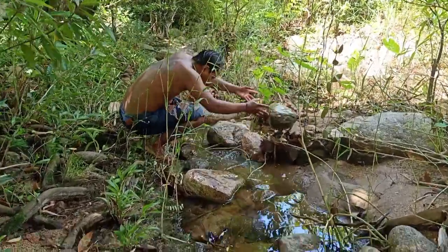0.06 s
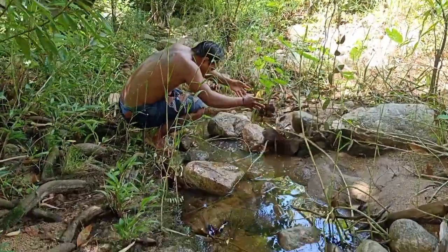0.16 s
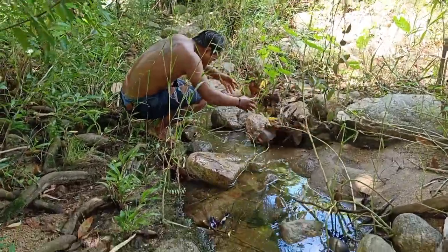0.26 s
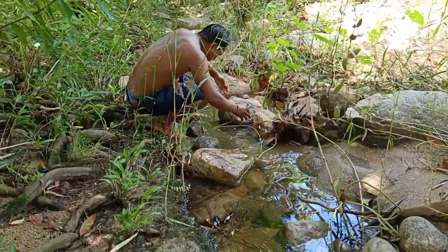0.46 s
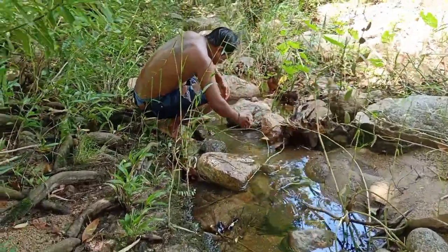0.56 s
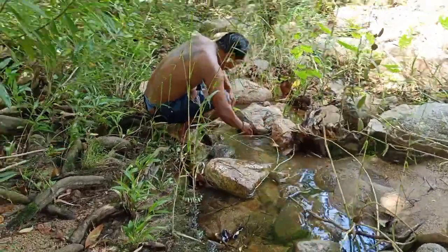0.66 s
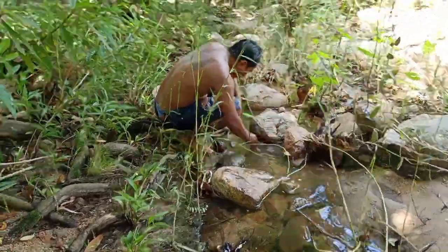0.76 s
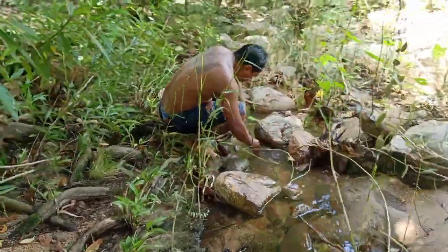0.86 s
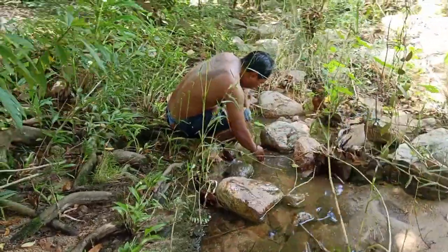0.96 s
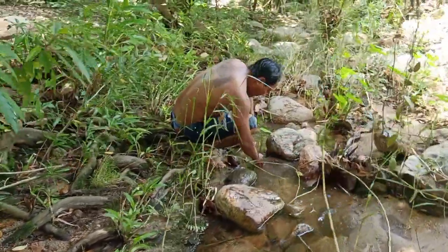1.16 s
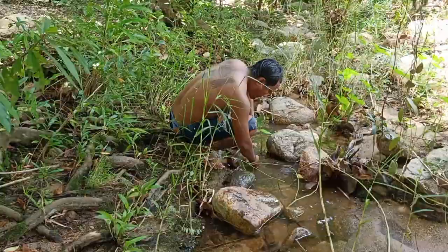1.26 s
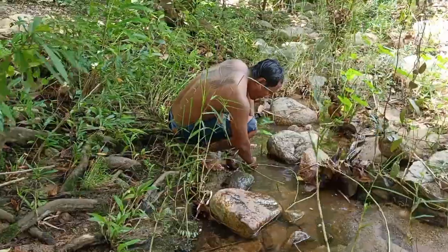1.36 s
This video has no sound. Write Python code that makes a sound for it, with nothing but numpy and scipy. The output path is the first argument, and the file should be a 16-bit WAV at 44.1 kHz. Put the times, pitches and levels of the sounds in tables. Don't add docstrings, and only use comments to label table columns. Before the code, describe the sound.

One close, round water plop with gliding bubble tones and quick rock echoes, preceded by a brief slide through leaves and faint clicks, over a soft constant brook hiss outdoors, in stereo.

```python
import sys
import numpy as np
from scipy import signal
from scipy.fft import rfft, irfft
from scipy.io import wavfile
from scipy.ndimage import uniform_filter1d

SR = 44100
rng = np.random.default_rng(int(sys.argv[2]) if len(sys.argv) > 2 else 0)


def voltage_ratio(level):
    return 10 ** (np.asarray(level, float) / 20)


def wav_record(signal):
    frames = np.transpose(np.atleast_2d(signal))
    bounded = np.clip(frames, -1, 1)
    quanta = np.round(bounded * 32767).astype(np.int16)
    wavfile.write(sys.argv[1], SR, quanta)


N = 61739

# (frequency [Hz], level per Hz [dB])
STREAM_SPECTRUM = [(40, -30.5), (110, -6.5), (300, 0), (800, 0.5), (1400, -5.5), (2500, -4), (3500, -13.5),
                   (14000, -33.5)]
# (frequency [Hz], share [0-1])
COMMON_SHARE = [(40, 1), (120, 0.94), (300, 0.98), (700, 0.59), (1400, .36), (2500, 0.15), (3500, 0.01)]
# (centre [Hz], width [Hz], boost [dB])
LEFT_MIC = [(1970, 420, 1), (2250, 1600, 3), (5740, 2900, 10), (11140, 860, 4), (14730, 1700, -17)]
# (centre [Hz], width [Hz], boost [dB])
RIGHT_MIC = [(1980, 700, 2), (4220, 1000, 0), (8400, 2770, 9.5), (11400, 510, 2.5), (15200, 730, -8)]
# (time [s], level [dB])
SLIDE_PRESSURE = [
    (.105, -25),
    (.135, -2),
    (.17, 0),
    (.2, -1),
    (.225, -8),
    (.29, -22),
]
# (frequency [Hz], level per Hz [dB])
LEAF_SPECTRUM = [(1200, -9), (2700, 3.5), (3600, 0), (5000, -13), (6300, -12), (8000, -19.5), (12000, -18),
                 (14500, -48)]
# (time [s], level [dB], pitch [Hz])
PEBBLE_TICKS = [
    (.1410, -37, 2700),
    (.1928, -29, 2500),
    (.1955, -34, 2550),
    (.1985, -35, 3000),
    (.2018, -28.5, 2600),
]
# (delay [s], left level [dB], right level [dB])
ROCK_ECHOES = [
    (0, 0, -1.1),
    (.0024, -22, -15),
    (.00375, -10.5, -7.5),
    (.0092, -23.5, -19),
    (.0129, -40, -13.2),
    (.0199, -40, -21),
    (.0262, -40, -31),
]
# (start time [s], left level [dB], right level [dB], start pitch [Hz], rise [Hz/s])
TRAPPED_AIR = [
    (.2124, -20.5, -45, 432, 10800),
    (.2123, -24, -24, 930, -3000),
    (.2106, -20.5, -33, 418, 1800),
    (.2241, -22.5, -30, 642, 9250),
    (.2098, -23, -22, 1250, 100),
]

STREAM_DB, SWELL_DB, FLICKER_DB = -43, 0.62, 0.98
RIGHT_LAG_S = 0.00033
BUBBLES_PER_S = 60
BUBBLE_CYCLES, BUBBLE_GLIDE = 7.5, 0.26
BUBBLE_DB, BUBBLE_SPREAD_DB = -6.5, 2
SLIDE_DB, SLIDE_RIGHT_DB = -43.5, -2
GRAINS_PER_S, GRAIN_SPREAD_DB = 6200, 1.2
TICK_T60_S, TICK_RIGHT_DB = 0.013, -5
PLOP_S, PLOP_DB, PUSH_S = 0.2081, -3.7, 0.00165
PLOP_HZ, PLOP_WIDTH_HZ = 925, 735
AIR_CYCLES = 31
TAIL_DB, TAIL_T60_S, TAIL_HZ, TAIL_WIDTH_HZ = -41, 0.4, 680, 780
LOW_CUT_HZ, DULL_HZ = 155, 1450
MIC_TOP_HZ = 15500


def curve(table, hz):
    table = np.array(table, float)
    return np.interp(np.log(np.maximum(hz, 1)), np.log(table[:, 0]), table[:, 1])


def unit(x):
    return x / np.sqrt(np.mean(x ** 2))


def pair(left_db, right_db):
    return voltage_ratio([[left_db], [right_db]])


def band(x, hz, width_hz):
    return signal.lfilter(*signal.iirpeak(hz, hz / width_hz, fs=SR), x)


def colour(x, gain):
    hz = np.arange(N // 2 + 1) * SR / N
    return irfft(rfft(x) * gain(hz), N)


def walk(rate):
    hold = int(SR / rate)
    steps = np.repeat(rng.standard_normal(N // hold + 1), hold)
    return 1.3 * uniform_filter1d(uniform_filter1d(steps, hold), hold)[:N]


def clicks(rate, spread_db):
    place, sign, size = rng.random((3, int(rate * N / SR)))
    strength = np.sign(sign - 0.5) * voltage_ratio(-spread_db * np.log(1 - size))
    return np.bincount((place * N).astype(int), strength, N)


def ring(start, hz, rise, t60, size=N):
    t = np.maximum(np.arange(size) / SR - start, 0)
    return np.sin(2 * np.pi * (hz + rise * t / 2) * t) * voltage_ratio(-60 * t / t60)


def rush():
    out = 0
    for hz in 40 * 2 ** (np.arange(27) / 3):
        hiss = unit(band(rng.standard_normal(N), hz, hz / 4))
        life = BUBBLE_CYCLES / hz
        start_hz = hz * (1 - BUBBLE_GLIDE / 2)
        bubble = ring(0, start_hz, hz * BUBBLE_GLIDE / life, 2 * life, size=int(2 * life * SR))
        births = clicks(BUBBLES_PER_S * hz / 500, BUBBLE_SPREAD_DB)
        bubbles = unit(signal.oaconvolve(births, bubble)[:N])
        water = hiss + voltage_ratio(BUBBLE_DB) * (hz > 200) * bubbles
        out = out + np.sqrt(hz) * voltage_ratio(FLICKER_DB * walk(10.14)) * water
    return unit(out)


def stream():
    def share(f):
        return np.clip(curve(COMMON_SHARE, f), 0, 1)

    left = rush()
    late = colour(left, lambda f: share(f) * np.exp(-2j * np.pi * f * RIGHT_LAG_S))
    diffuse = colour(rush(), lambda f: np.sqrt(1 - share(f) ** 2))
    both = np.array([left, late + diffuse])
    water = unit(colour(both, lambda f: voltage_ratio(curve(STREAM_SPECTRUM, f))))
    return voltage_ratio(STREAM_DB + SWELL_DB * walk(2.47)) * water


def leaves():
    time, level = np.array(SLIDE_PRESSURE).T
    press = voltage_ratio(np.interp(np.arange(N) / SR, time, level, left=-90, right=-90))
    grains = [unit(colour(clicks(GRAINS_PER_S, GRAIN_SPREAD_DB), lambda f: voltage_ratio(curve(LEAF_SPECTRUM, f))))
              for _ in range(2)]
    return press * np.array(grains) * pair(SLIDE_DB, SLIDE_DB + SLIDE_RIGHT_DB)


def pebbles():
    ticks = sum(voltage_ratio(db) * ring(start, hz, 0, TICK_T60_S) for start, db, hz in PEBBLE_TICKS)
    return ticks * pair(0, TICK_RIGHT_DB)


def cavity_blow(start):
    t = np.arange(N) / SR
    push = np.sin(np.pi * np.clip((t - start) / PUSH_S, 0, 1)) ** 2
    narrow = band(band(push, PLOP_HZ, PLOP_WIDTH_HZ), PLOP_HZ, PLOP_WIDTH_HZ)
    return band(narrow, PLOP_HZ, 2 * PLOP_WIDTH_HZ)


def trapped_air():
    return sum(pair(left_db, right_db) * ring(start, hz, rise, AIR_CYCLES / hz)
               for start, left_db, right_db, hz, rise in TRAPPED_AIR)


def pool_tail():
    t = np.arange(N) / SR
    fade = (t > PLOP_S) * voltage_ratio(TAIL_DB - 60 * np.abs(t - PLOP_S) / TAIL_T60_S)
    noise = band(rng.standard_normal((2, N)), TAIL_HZ, TAIL_WIDTH_HZ)
    return fade * unit(band(noise, TAIL_HZ, TAIL_WIDTH_HZ))


def plop():
    peak = np.abs(cavity_blow(PLOP_S)).max()
    echoes = sum(cavity_blow(PLOP_S + delay) * pair(left_db, right_db)
                 for delay, left_db, right_db in ROCK_ECHOES)
    blow = echoes * voltage_ratio(PLOP_DB) / peak
    dull = colour(blow + trapped_air() + pool_tail(), lambda f: 1 / (1 + (f / DULL_HZ) ** 10))
    return signal.sosfilt(signal.butter(2, LOW_CUT_HZ, "high", fs=SR, output="sos"), dull)


def scene():
    return stream() + leaves() + pebbles() + plop()


def microphone(x, bumps):
    def response(f):
        boost_db = sum(db * np.exp(-((f - hz) / width) ** 2 * 2) for hz, width, db in bumps)
        return (f < MIC_TOP_HZ) * voltage_ratio(boost_db)

    return colour(x, response)


def top_cut(x):
    return signal.sosfilt(signal.butter(12, 15570, fs=SR, output="sos"), x)


def record(dry):
    left, right = dry
    heard = np.array([microphone(left, LEFT_MIC), microphone(right, RIGHT_MIC)])
    return top_cut(heard)


dry = scene()
out = record(dry)
wav_record(out)
```